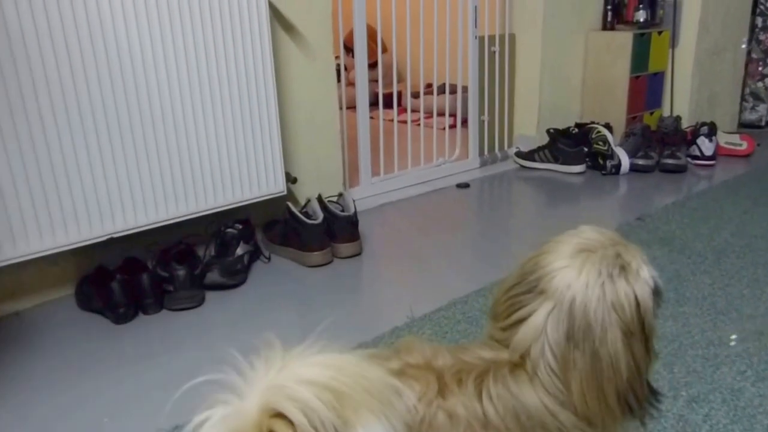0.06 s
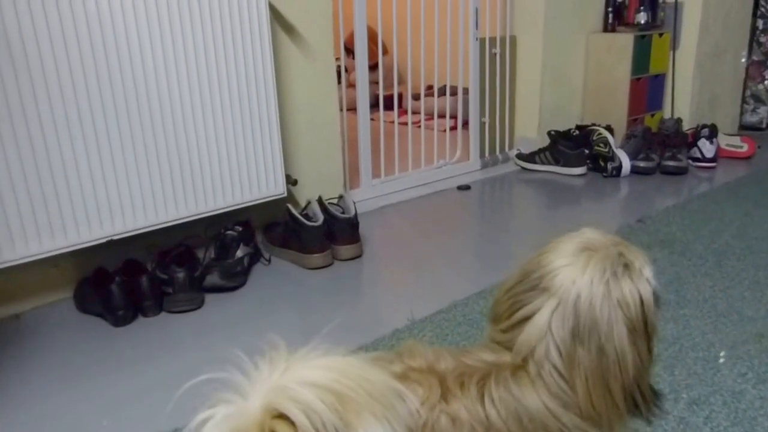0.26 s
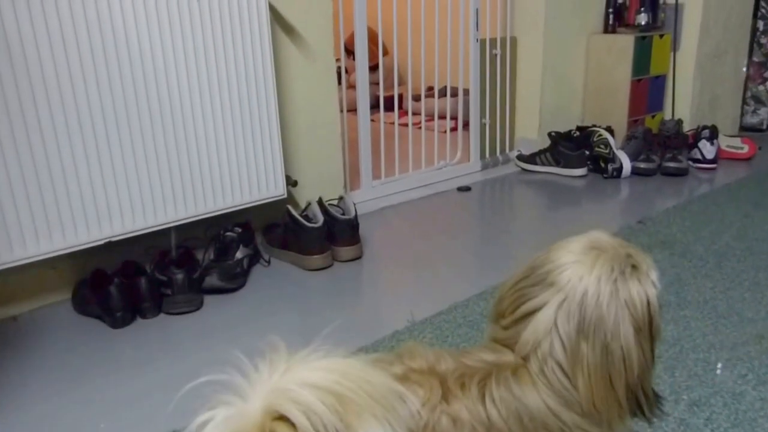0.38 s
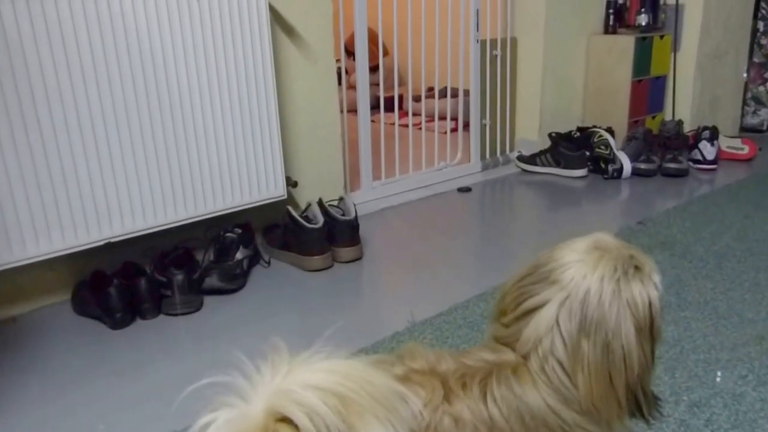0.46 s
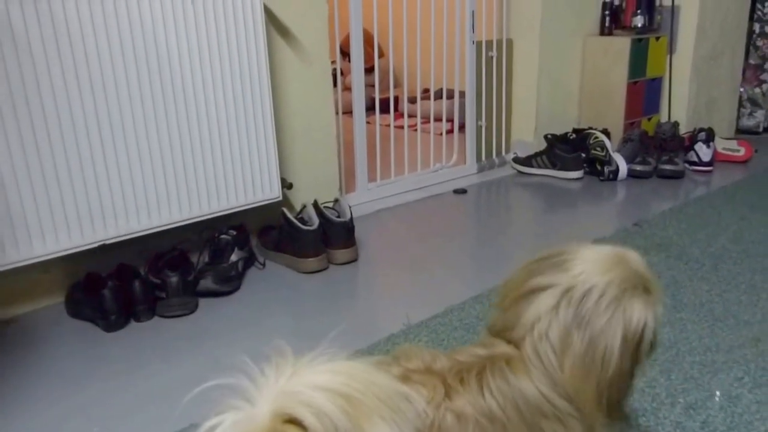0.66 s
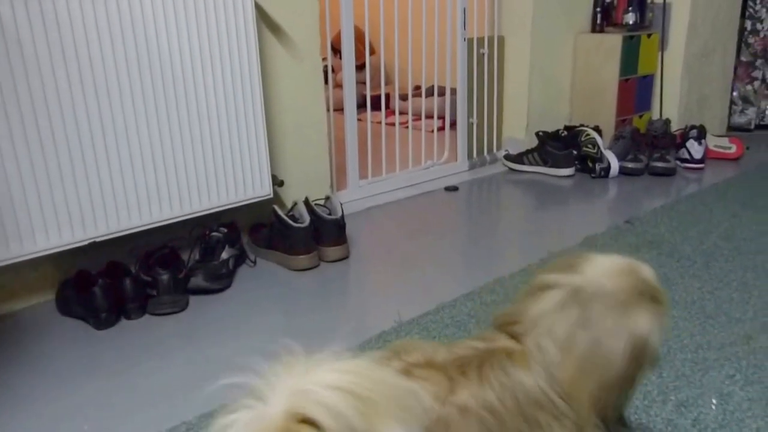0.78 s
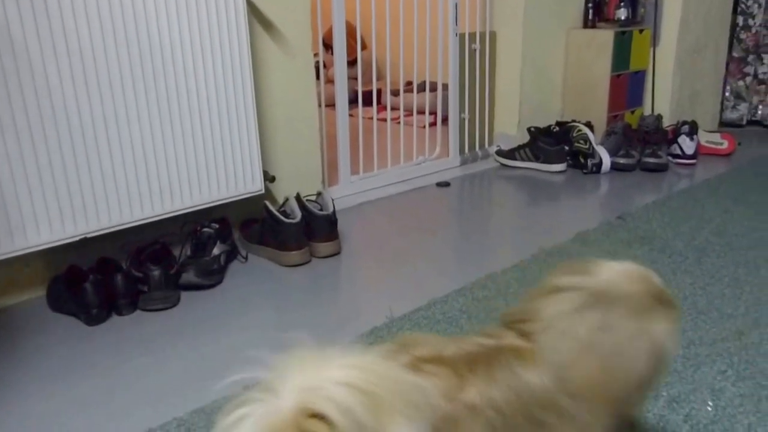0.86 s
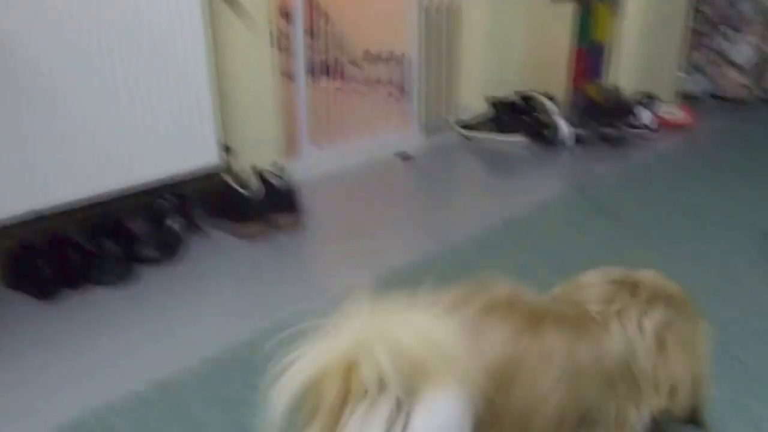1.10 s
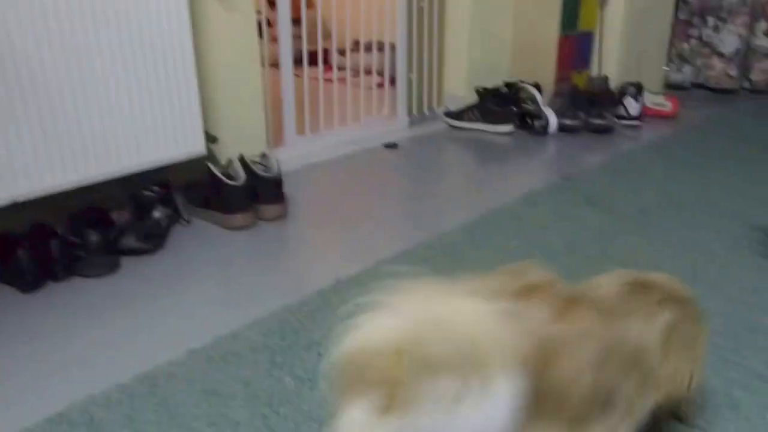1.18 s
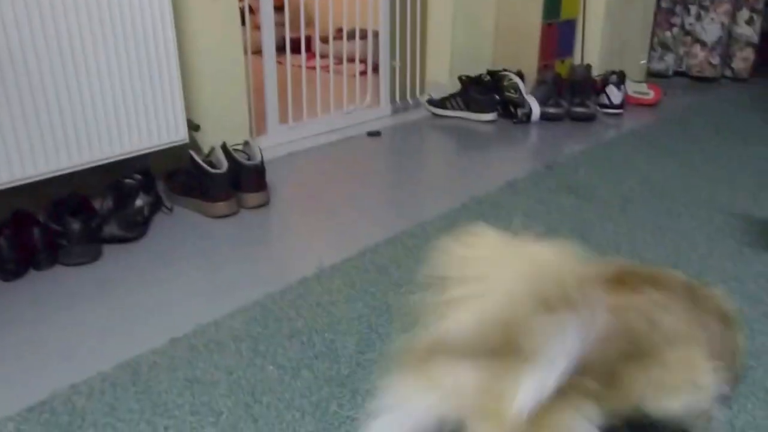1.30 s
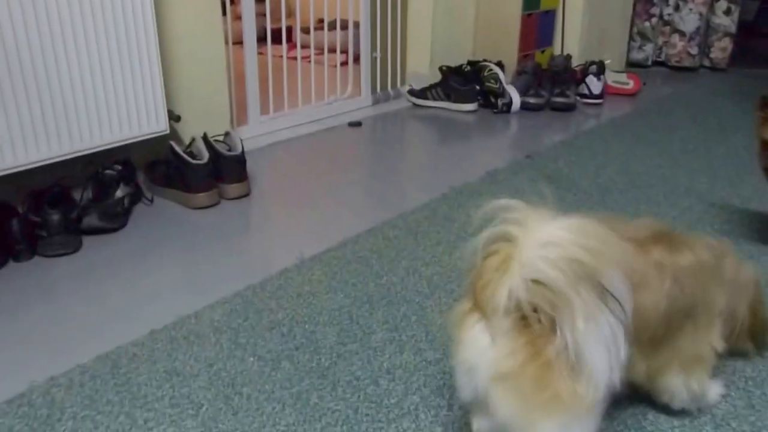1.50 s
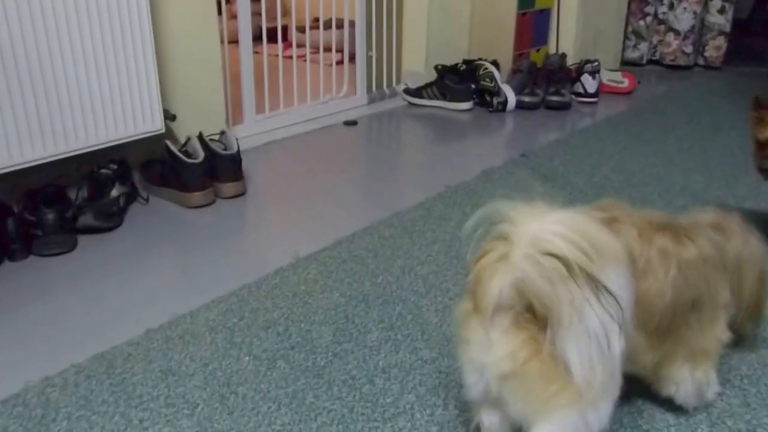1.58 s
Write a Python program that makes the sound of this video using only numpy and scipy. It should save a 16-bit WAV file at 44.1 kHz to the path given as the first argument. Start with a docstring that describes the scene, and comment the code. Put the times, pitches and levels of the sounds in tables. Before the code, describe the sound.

One sharp clack of a dog's jaws, then small clicks and paws brushing carpet.

```python
"""In a carpeted hallway, a small dog snaps at soap bubbles. Its teeth clack once, hard, and ring the jaw;
lighter clicks and faint wet squeaks of the mouth follow. It turns and trots off with soft footfalls,
coat and paws brushing the carpet. The hard walls answer each click, and a motor's low hum
and a faint hiss fill the room."""
import sys
import numpy as np
from scipy import signal
from scipy.fft import rfft, irfft
from scipy.io import wavfile

SR = 44100
rng = np.random.default_rng(int(sys.argv[2]) if len(sys.argv) > 2 else 0)


def file_out(sig):
    """Save sig as 16-bit WAV at sys.argv[1]."""
    # one column per channel
    cols = np.atleast_2d(sig).T
    # limit, then scale
    lim = np.clip(cols, -1, 1)
    pcm = np.round(lim * 32767).astype(np.int16)
    wavfile.write(sys.argv[1], SR, pcm)


N = 72765


def amp(db):
    """Turns decibels into a number to multiply by."""
    return 10 ** (np.asarray(db) / 20)


def unit(x):
    """Scales a sound to an average strength (rms) of 1."""
    return x / np.sqrt(np.mean(x ** 2) + 1e-20)


def read(points, hz):
    """Looks up a frequency in a table, gliding between rows on a log scale."""
    f, value = np.transpose(points)
    return np.interp(np.log(hz + 1), np.log(f + 1), value)


def pan(db):
    """Two gains that make the left side db louder than the right."""
    return amp(np.array([[db], [-db]]) / 2)


def add(mix, s, sound):
    """Mixes a sound in, starting at s seconds."""
    part = mix[..., round(s * SR):][..., :sound.shape[-1]]
    part += sound[..., :part.shape[-1]]


def stereo_noise(size, likeness):
    """Noise whose two sides are partly alike: 1 is the same, 0 unrelated, -1 opposite."""
    left, other = rfft(rng.standard_normal((2, size)))
    alike = np.clip(read(likeness, np.fft.rfftfreq(size, 1 / SR)), -1, 1)
    right = alike * left + np.sqrt(1 - alike ** 2) * other
    return irfft(np.array([left, right]), size)


def tint(noise, colour):
    """Gives noise a colour (its balance of low and high), at strength 1."""
    size = noise.shape[-1]
    gain = amp(read(colour, np.fft.rfftfreq(size, 1 / SR)))
    return unit(irfft(rfft(noise) * gain, size))


def pulse(colour, size=2048):
    """A click of the given colour that starts sharply, then dies away."""
    log_gain = np.log(amp(read(colour, abs(np.fft.fftfreq(size, 1 / SR)))))
    return np.fft.ifft(np.exp(np.conj(signal.hilbert(log_gain)))).real


def band(x, low_hz, high_hz):
    """Keeps what lies between two frequencies."""
    x = signal.sosfilt(signal.butter(4, low_hz, btype="high", fs=SR, output="sos"), x)
    return signal.sosfilt(signal.butter(5, high_hz, fs=SR, output="sos"), x)


# the tones in the hum: multiple of its pitch, level/dB
HUM_TONES = [(1, -3.5), (2, -17.5), (3, -15), (4, -20), (6, -21), (7, -16.5)]
# colour of the hiss: f/Hz, level/dB
HISS_COLOUR = [(12, -47), (20, -12), (91, -16.5), (123, -10.5), (150, -10.5), (198, -12), (301, -3.5),
               (388, -4.5), (873, -8.5), (1910, -16.5), (2200, -16), (2750, -21.5), (9140, -25.5),
               (13500, -30.5), (16000, -47)]
# how alike the hiss is left and right: f/Hz, likeness
HISS_LIKENESS = [(30, 0.48), (150, 0.3), (400, -0.83), (1000, -0.49), (3000, 0.24), (15000, 0.72)]
def room_tone(hum_hz=148.6, hum_db=-66.5, hiss_db=-58.5):
    """A household motor hums under a faint, steady hiss."""
    t = np.arange(N) / SR
    hum = sum(amp(db) * np.sin(2 * np.pi * (k * hum_hz * t + rng.random())) for k, db in HUM_TONES)
    hiss = tint(stereo_noise(N, HISS_LIKENESS), HISS_COLOUR)
    return amp(hum_db) * pan(2) * unit(hum) + amp(hiss_db) * pan(.5) * hiss


# how alike sounds in the hall are left and right: f/Hz, likeness
HALL_LIKENESS = [(100, 0.86), (300, 0.52), (640, -0.11), (1400, 0.74), (7000, 0.82), (15000, 0.16)]
# how long the hall takes to fade by 60 dB: f/Hz, fade/s
HALL_FADE = [(200, 0.49), (1100, 0.19), (1680, 0.31), (2200, 0.28), (3000, 0.27), (4000, 0.41),
             (4800, 0.36), (8000, 0.26), (15000, 0.19)]
# echoes off nearby surfaces: delay/s, level/dB
ECHOES = [(.0042, -17.5), (.0121, -22), (.0171, -15), (.0294, -22)]
def hall(x, onset_s=.0029, early_db=3.5, early_s=.014):
    """The walls return a few echoes and a blurred tail, each frequency fading at its own pace."""
    t = np.arange(SR // 2) / SR
    hz, times, bands = signal.stft(stereo_noise(len(t), HALL_LIKENESS), SR, nperseg=256)
    fade = amp(-60 * times / read(HALL_FADE, hz)[:, None])
    tail = signal.istft(bands * fade, SR, nperseg=256)[1][:, :len(t)]
    tail *= np.clip(t / onset_s, 0, 1)
    tail *= 1 + amp(early_db) * np.exp(-t / early_s)  # extra strong at first
    tail /= np.linalg.norm(tail[0])
    for delay, db in ECHOES:
        add(tail, delay, amp(db) * np.ones((2, 1)))
    return pan(1.5) * signal.fftconvolve(x[None], tail, axes=1)[:, :N]


# loudness of the moving body: t/s, level/dB
RUSTLE_LEVEL = [(0, -96), (.7, -72.5), (1.05, -67.5), (1.25, -59.5), (1.42, -53.5), (1.51, -56),
                (1.56, -58), (1.65, -57)]
# colour of its rustle: f/Hz, level/dB
RUSTLE_COLOUR = [(100, -17), (300, -9.5), (620, -8.5), (890, 1), (1200, -10), (3000, -18), (8000, -13.5),
                 (15000, -28)]
def body_rustle():
    """A dull rustle grows as the dog gets moving."""
    level = amp(np.interp(np.arange(N) / SR, *np.transpose(RUSTLE_LEVEL)))
    return level * tint(stereo_noise(N, HALL_LIKENESS), RUSTLE_COLOUR)


def puffs(rows, width_octaves, rise_s=.0019):
    """Short bursts of noise, each gathered around one pitch."""
    out = np.zeros((2, N))
    t = np.arange(SR // 4) / SR
    hz = np.fft.rfftfreq(len(t), 1 / SR) + 1
    for s, db, pitch_hz, fade_s in rows:
        spectrum = rfft(stereo_noise(len(t), HALL_LIKENESS))
        peak = 1 / (1 + (np.log2(hz / pitch_hz) / width_octaves) ** 2)
        burst = unit(irfft(spectrum * peak, len(t)))
        shape = np.minimum(t / rise_s, 1) * np.exp(-np.maximum(t - rise_s, 0) / fade_s)
        add(out, s, amp(db) * burst * shape)
    return out


# paws landing: t/s, level/dB, f/Hz, fade/s
PAWS = [(.672, -56, 560, 0.013), (1.0, -53.5, 574, 0.014), (1.108, -58, 855, .014), (1.245, -58, 355, .01),
        (1.272, -49.5, 1140, .02), (1.404, -47, 385, 0.0097), (1.405, -47, 960, .012),
        (1.431, -52.5, 240, 0.0071), (1.442, -54, 417, .016), (1.444, -47.5, 697, 0.034)]
def footfalls():
    """Padded feet land in soft puffs with only a vague pitch."""
    return puffs(PAWS, width_octaves=.24)


# strokes over the carpet: t/s near the peak, level/dB, rise/s, fall/s
STROKES = [(1.284, -47, 0.012, .014), (1.352, -51, 0.014, 0.016), (1.397, -43.5, 0.01, 0.016),
           (1.45, -57.5, 0.038, 0.022)]
# colour of the brushing: f/Hz, level/dB
BRUSH_COLOUR = [(60, -45), (200, -26), (500, -15), (900, -11.5), (1300, -2.5), (1700, -8), (2430, -2),
                (3340, -8.5), (4300, -2.5), (4900, -2), (5600, -5), (8000, -7), (11000, -8), (13500, -23),
                (16000, -42)]
def carpet_brushing(grain_db=1.5, hall_db=-11.5):
    """Carpet fibres flick past coat and paws in grainy swells."""
    t = np.arange(N) / SR
    swells = [amp(db) * 2 / (np.exp((s - t) / rise) + np.exp((t - s) / fall))
              for s, db, rise, fall in STROKES]
    level = np.sqrt(sum(swell ** 2 for swell in swells))
    noise = stereo_noise(N, HALL_LIKENESS)
    grains = noise * amp(grain_db * np.minimum(rng.exponential(1, N), 5))
    out = level * tint(grains, BRUSH_COLOUR)
    return out + amp(hall_db) * hall(out.mean(0))


# squeaks of the lips: t/s, level/dB, f/Hz, fade/s
SQUEAKS = [(.835, -63.5, 3040, .01), (.860, -63, 3060, 0.012)]
def lip_squeaks():
    """Wet lips squeak faintly: noise so narrow it is almost a note."""
    return puffs(SQUEAKS, width_octaves=.094)


# light clicks of teeth and lips: t/s, level/dB, lowest f/Hz, highest f/Hz, left over right/dB
CLICKS = [(.3163, -27, 4000, 8900, 3), (0.3256, -21, 3350, 9200, 9), (0.3307, -33, 4000, 9600, -1),
          (0.3349, -25.5, 3450, 9100, -6), (0.348, -32.5, 4470, 10100, 12), (0.3571, -27.5, 4050, 9000, 7),
          (0.3916, -33, 4000, 8040, 12), (.3960, -23.5, 4130, 8400, 6.5), (0.4087, -32.5, 4550, 8300, 0),
          (.4701, -19, 3360, 12500, 5.5), (0.4744, -29.5, 3500, 15300, 6), (.5910, -39, 2800, 8200, 7),
          (.7475, -33.5, 7000, 7700, 5), (.805, -43, 7000, 13000, -1), (0.9066, -46.5, 6500, 8500, 12),
          (1.001, -44, 2500, 11100, -1), (1.481, -30, 6000, 8700, -7)]
# colour of the half-open mouth: f/Hz, level/dB
MOUTH_COLOUR = [(300, -18), (2200, 3), (2850, 5.5), (3400, -9.5), (4300, -1.5), (5200, 2.5), (6100, -7),
                (7150, 3), (8400, -4.5), (9400, -0.5), (10300, -5), (11700, -3), (16000, -14)]
def mouth_clicks(grit=.23, fade_s=.00081, hall_db=-3):
    """Each click is a tiny gritty slip, coloured by the mouth."""
    out = np.zeros((2, N))
    t = np.arange(256) / SR
    for s, db, low_hz, high_hz, side_db in CLICKS:
        slip = grit * rng.standard_normal(len(t)) * np.exp(-t / fade_s)
        slip[0] += 1  # the sharp start
        click = band(np.convolve(slip, pulse(MOUTH_COLOUR)), low_hz, high_hz)
        add(out, s, amp(db) * pan(side_db) * click / np.linalg.norm(click))
    return out + amp(hall_db) * hall(out.mean(0))


# a bright touch of the tooth tips, then the full bite: t/s, level/dB, lowest f/Hz, highest f/Hz
CONTACTS = [(.2474, -1.5, 5000, 10470), (.2480, 1, 1393, 4300)]
# ringing tones of teeth and jaw: f/Hz, level/dB, time to fade by 60 dB/s
JAW_TONES = [(1680, -11.5, 0.0059), (3130, -15.5, .006), (3710, -8.5, 0.0068), (5520, -13, .003),
             (6960, -8, 0.002), (9220, -12, .0035), (10730, -19.5, 0.0044)]
# colour of the snap as it spreads into the hall: f/Hz, level/dB
SNAP_COLOUR = [(100, -34), (330, -28), (560, -10.5), (800, -12.5), (1150, -5), (1450, 1), (1720, 6.5),
               (2050, -4.5), (2400, -4.5), (2750, -1.5), (3300, -9), (3950, -1), (4400, -10.5),
               (7000, -11.5), (9700, -13.5), (11500, -23), (16000, -36.5)]
def teeth_snap(direct_db=-1.5, side_db=6, hall_db=9.5):
    """The teeth meet twice, under a millisecond apart; the jaw rings and the hall answers."""
    t = np.arange(2048) / SR
    ring = sum(amp(db - 60 * t / fade_s) * np.sin(2 * np.pi * hz * t) for hz, db, fade_s in JAW_TONES)
    direct, spread = np.zeros((2, N))
    for s, db, low_hz, high_hz in CONTACTS:
        add(direct, s, amp(db) * band(ring, low_hz, high_hz))
    bite_s = CONTACTS[-1][0]
    add(spread, bite_s, amp(hall_db) * pulse(SNAP_COLOUR))
    return amp(direct_db) * pan(side_db) * direct + hall(spread)


def scene():
    """The dog in its hallway."""
    mouth = teeth_snap() + mouth_clicks() + lip_squeaks()
    movement = carpet_brushing() + body_rustle() + footfalls()
    return mouth + movement + room_tone()


def record(dry):
    """Cuts away the very highest treble, above 16200 Hz."""
    treble_cut = signal.firwin(255, 16200, window=("kaiser", 8), fs=SR)
    return signal.oaconvolve(dry, treble_cut[None], "same")


dry = scene()
out = record(dry)
file_out(out)
```